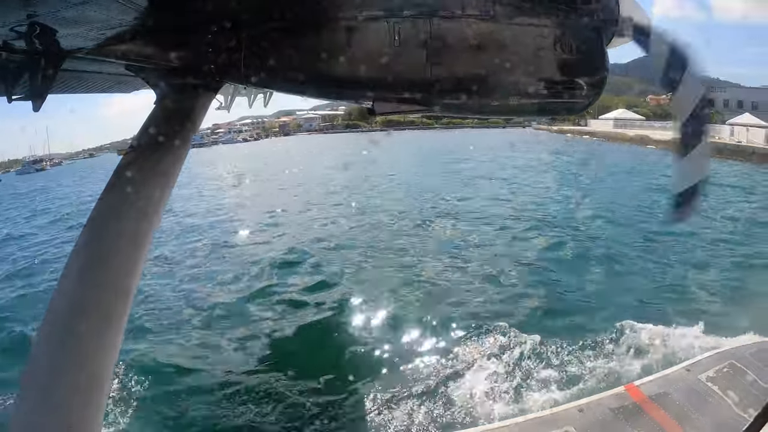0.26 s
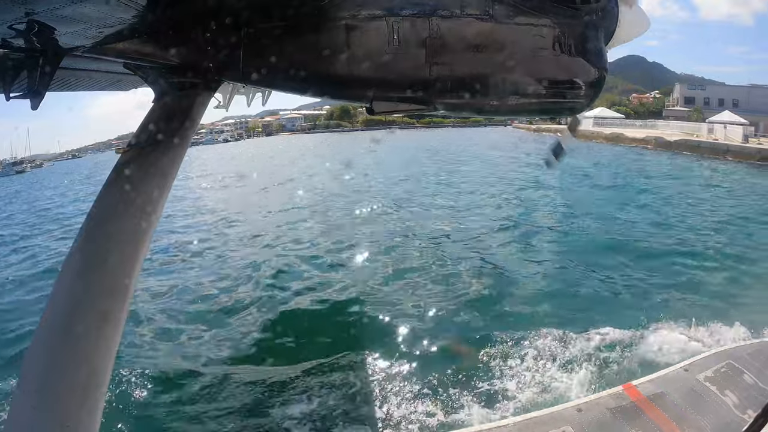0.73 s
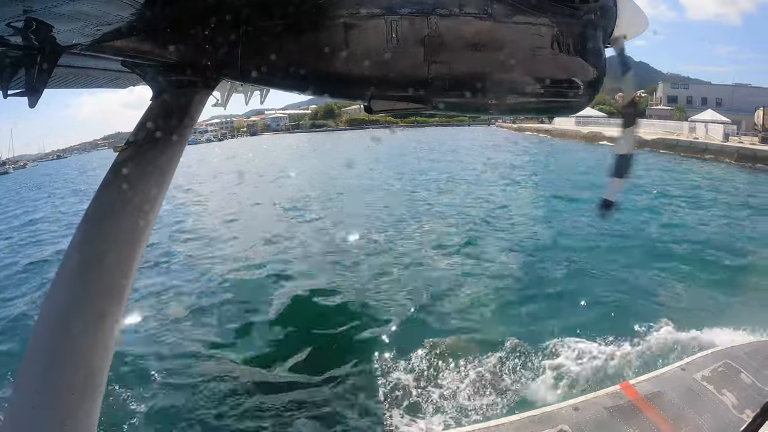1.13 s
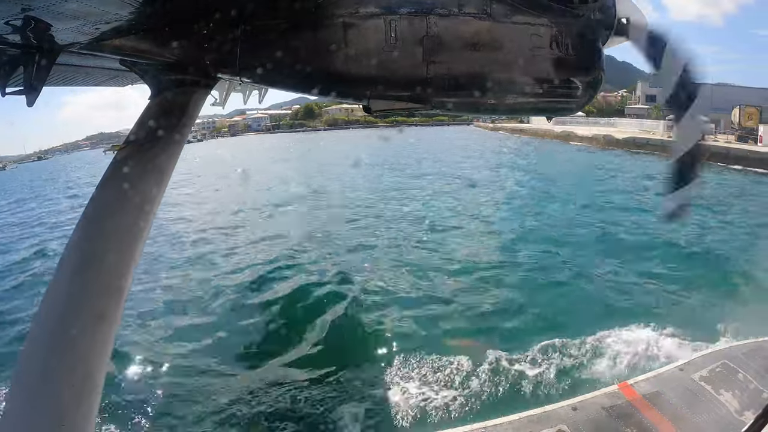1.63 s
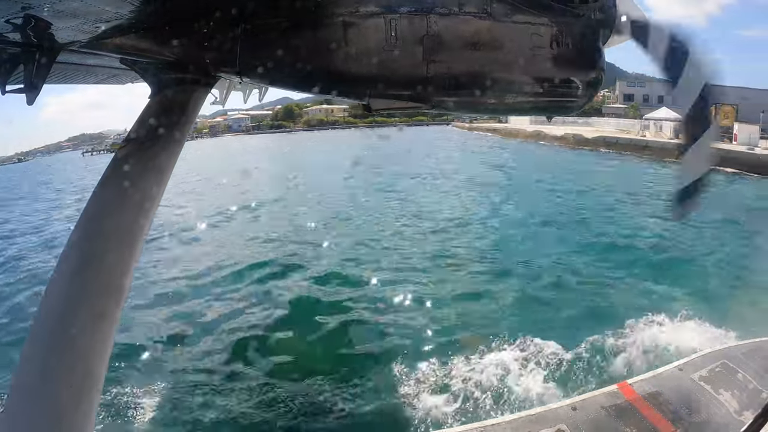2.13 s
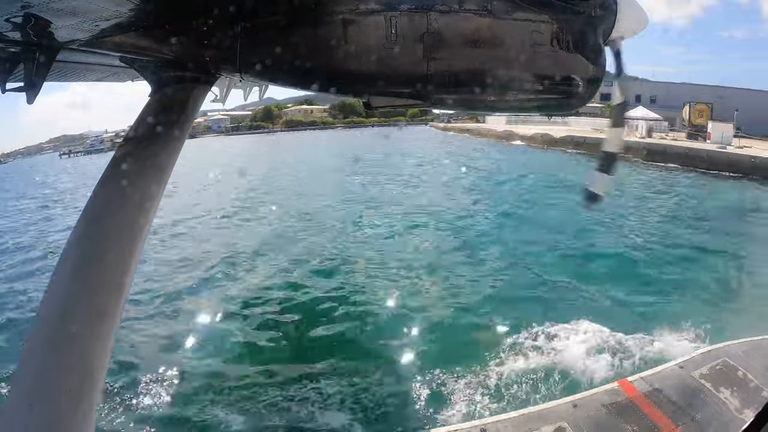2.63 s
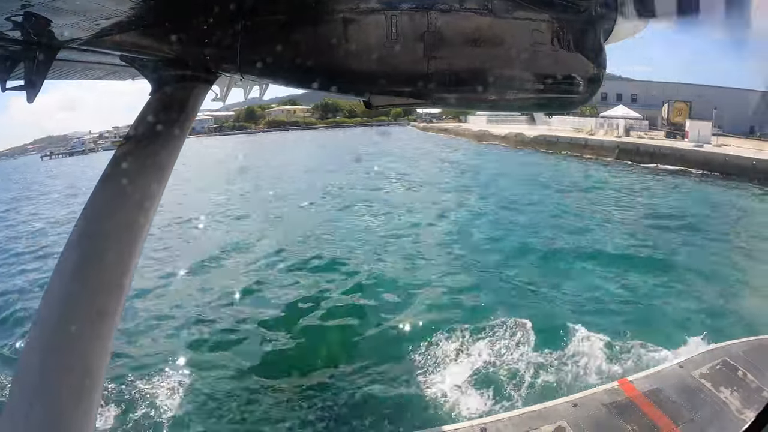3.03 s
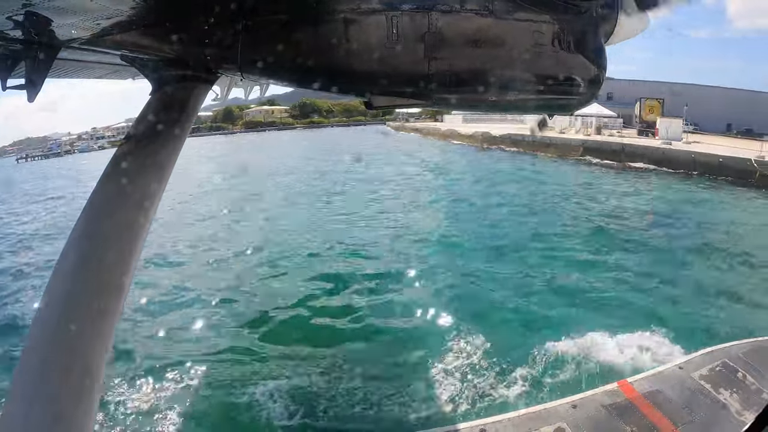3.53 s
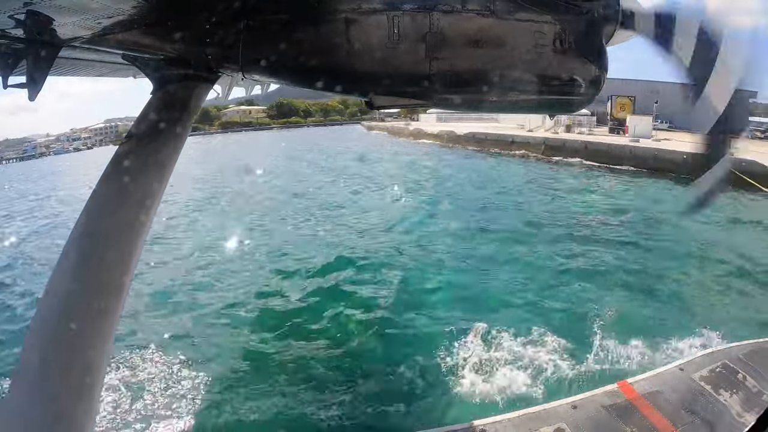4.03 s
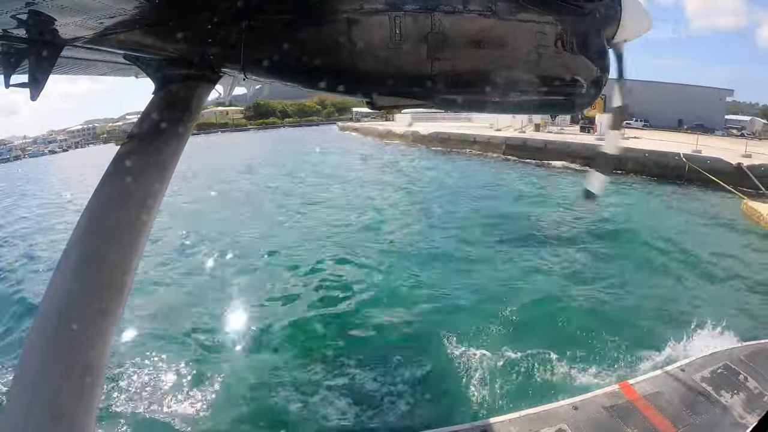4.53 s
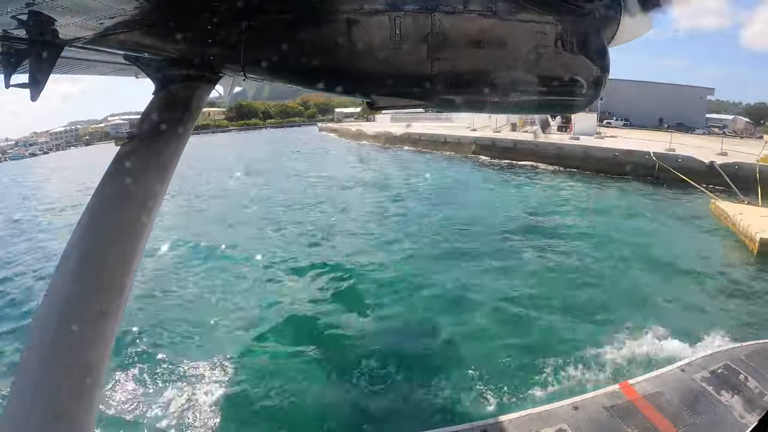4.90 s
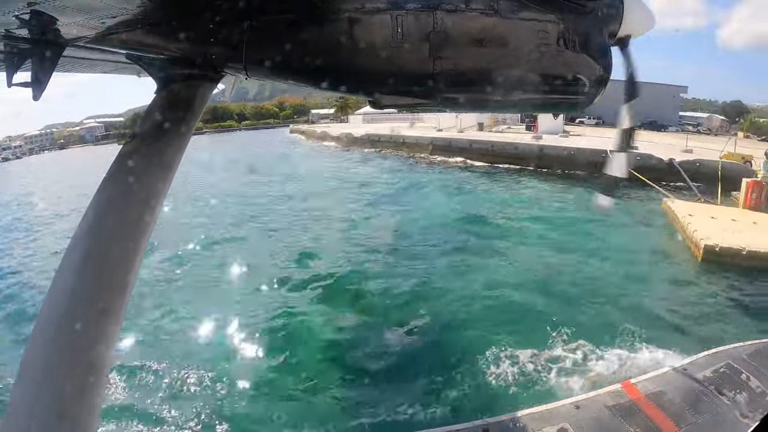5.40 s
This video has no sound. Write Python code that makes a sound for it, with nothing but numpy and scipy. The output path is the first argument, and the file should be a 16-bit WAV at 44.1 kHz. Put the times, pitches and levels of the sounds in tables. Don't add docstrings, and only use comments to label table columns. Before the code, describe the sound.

Two turboprop engines dominate a small cabin on the water: a thick, pulsing hum with lower idling drone and faint thin whistles that fade early. After two seconds the near propeller speeds up and its hum tightens, while the airy whine climbs to a piercing, trembling hiss-like tone. Constant muffled roar and panel buzz surround it, with dull float thumps below. One cabin microphone, near the wall.

```python
import sys
import numpy as np
from scipy import signal
from scipy.fft import rfft, irfft, next_fast_len
from scipy.io import wavfile

SR = 44100
rng = np.random.default_rng(int(sys.argv[2]) if len(sys.argv) > 2 else 0)


def dump(signal):
    limited = np.clip(np.atleast_2d(signal).T, -1, 1)
    pcm = np.round(limited * 32767).astype(np.int16)
    wavfile.write(sys.argv[1], SR, pcm)


def nominal_scale(level):
    x = np.asarray(level, float) / 20
    return 10 ** x


N = 249606

# t/s, f/Hz, level/dB
NEAR_PROPELLER = [(0, 67.3, -10.5), (.4, 67.34, 1.5), (.7, 66.57, -7.5), (1.2, 68.08, -6.5),
                  (1.6, 68.59, 0), (2.0, 68, 4.5), (2.4, 70.9, -2), (2.8, 73.14, 0.5), (3.2, 75.7, 1),
                  (3.6, 79.1, 3.5), (4.0, 83.37, 1), (4.3, 85.87, 0.5), (4.6, 87.46, -1), (4.9, 88.1, 0),
                  (5.2, 88.5, 2), (5.4, 89.77, -4), (5.66, 92.1, -0.5)]


def rms_one(x):
    return x / np.sqrt(np.mean(x ** 2) + 1e-20)


def in_time(rows):
    s, *columns = np.transpose(rows)
    return [np.interp(np.arange(N) / SR, s, c) for c in columns]


def at_hz(points, hz):
    f, db = np.transpose(points)
    return np.interp(np.log(hz), np.log(f), db)


def swells(rows, width_s):
    s = np.arange(N) / SR
    return sum(db * np.exp(-.5 * ((s - centre) / width_s) ** 2) for centre, db in rows)


def drift(rate):
    spacing = 40
    r = np.exp(-80 * np.pi * rate / SR)
    noise = rng.standard_normal(N // spacing + 2002)
    slow = signal.lfilter([1], [1, -2 * r, r * r], noise)[2000:]
    return np.interp(np.arange(N) / spacing, np.arange(len(slow)), rms_one(slow))


def turns(hz):
    return 2 * np.pi * np.cumsum(hz) / SR


def tone(phase, rough, width_hz):
    rough = np.clip(rough, 0, 1)
    phase = phase + .8 * drift(.3)
    ragged = drift(width_hz) * np.cos(phase) + drift(width_hz) * np.sin(phase)
    return np.sqrt(2 - 2 * rough) * np.cos(phase) + np.sqrt(rough) * ragged


def power():
    hz = in_time(NEAR_PROPELLER)[0]
    return (hz - hz.min()) / (hz.max() - hz.min())


def coloured(spectrum):
    # f/Hz, bandwidth/Hz, lift level/dB
    panels = [(350, 36, -3.5), (425, 40, 4), (836, 99, 4), (776, 50, 2), (1350, 33, 3), (1452, 25, 5),
              (1668, 27, 5), (1730, 30, -1.5), (1944, 27, 5), (2104, 97, 3), (2430, 46, 1), (2840, 92, 5.5),
              (3130, 260, 7), (2963, 33, 5), (3336, 45, 6), (3950, 40, 0), (4394, 33, 7), (12700, 830, 5)]
    size = next_fast_len(N)
    hz = np.maximum(np.fft.rfftfreq(size, 1 / SR), 10)
    f, level_db = np.transpose(spectrum)
    db = np.interp(np.log(hz), np.log(f), level_db, left=-80, right=-80)
    db = db + sum(lift / (1 + (2 * (hz - f) / w) ** 2) for f, w, lift in panels)
    white = rfft(rng.standard_normal(size))
    return rms_one(irfft(white * nominal_scale(db), size)[:N])


def roar():
    # t/s, level/dB
    effort = [(0, -1), (.5, -1), (.75, -1.5), (1.3, -0.5), (1.9, 1), (2.15, -1.5), (2.55, -2.5), (2.8, 1),
              (3.25, .5), (3.4, 1), (3.9, 1), (4.35, 0), (4.6, .5), (5.05, 3), (5.25, 3), (5.4, 1),
              (5.66, 2)]
    # f/Hz, level/dB (per Hz)
    rumble_spectrum = [(12, -12), (20, -14), (32, 7), (42, -14), (60, -29)]
    low_spectrum = [(40, -36), (60, 1), (100, -4), (200, 2), (300, -3), (450, -1.5), (600, -6.5),
                    (900, -13), (1050, -23), (1400, -34.5)]
    middle_spectrum = [(560, -15), (950, -5), (1070, -2.5), (1230, 0.5), (1550, -3), (1700, 0.5),
                       (2260, -8.5), (3080, -8), (3670, -11), (5500, -20.5), (7150, -45), (12100, -120)]
    hiss_spectrum = [(2940, -15), (5000, -1), (6500, -4), (7420, -7), (8190, -7.5), (9500, -14),
                     (11400, -20), (12100, -23), (13300, -17.5), (13800, -28), (16500, -22)]
    # t/s, level/dB
    slaps = [
        (.27, 8),
        (.82, 4),
        (.98, 7),
        (1.59, 8),
        (3.25, -1),
        (4.33, 10),
        (4.6, 8),
        (4.98, 8),
        (5.37, 8),
    ]
    # t/s, level/dB
    lulls = [
        (2.25, -1),
        (2.45, 0),
        (3.37, -3),
        (4.8, -1.5),
        (5.54, -4),
    ]
    # t/s, level/dB
    buzzes = [
        (2.8, 8),
        (5.1, 7),
    ]

    effort_db, = in_time(effort)
    chop = 1 + 0.078 * np.cos(turns(in_time(NEAR_PROPELLER)[0]))
    gust_db = (.25 + .7 * power()) * drift(14)
    rumble = nominal_scale(-38.5 + swells(slaps, width_s=0.091)) * coloured(rumble_spectrum)
    low = nominal_scale(-20.5 + 0.19 * effort_db + 0.36 * drift(13)) * coloured(low_spectrum)
    middle = nominal_scale(-32.5 + effort_db + 1.15 * gust_db) * coloured(middle_spectrum)
    hiss_db = -45.5 + 0.86 * effort_db + gust_db + swells(lulls, width_s=.03)
    hiss = nominal_scale(hiss_db) * coloured(hiss_spectrum)
    buzz_hz = np.full(N, 1247)
    buzz = nominal_scale(-46.5 + swells(buzzes, width_s=.15)) * tone(turns(buzz_hz), rough=1.0, width_hz=10)
    return rumble + low + buzz + chop * (middle + hiss)


def idle_engine():
    # t/s, level/dB
    loading = [(0, -1), (1.5, -0.5), (2.1, -7), (3.0, -3), (3.35, -25), (4.2, -13), (4.6, -9), (5.66, -4)]
    # order, level/dB, change of level at full power/dB
    orders = [(1, -23.5, 2), (2, -24, -11), (4, -24.5, -13), (8, -35.5, -1)]
    # t/s, level/dB
    surges = [
        (.3, 5),
        (.62, 12.6),
        (1.1, 9.9),
        (1.2, 11),
        (1.45, 6),
        (2.55, 9.84),
    ]
    whistle_hz = [4958, 5055, 10110, 15170]
    # level/dB, bandwidth/Hz
    whistle_lines = [(-63, 10), (-64, 10), (-79, 12), (-80, 12)]
    fade_s = (.7, 1.7)

    s = np.arange(N) / SR
    phase = turns(48.1 + 1.1 * s)
    loading_db, = in_time(loading)
    levels_db = [db + loading_db + change_db * power() for order, db, change_db in orders]
    first_db, second_db, fourth_db, eighth_db = levels_db
    eighth_db = eighth_db + swells(surges, width_s=.05)
    drone = nominal_scale(first_db) * tone(phase, rough=0.033, width_hz=7.1)
    drone = drone + nominal_scale(second_db) * tone(2 * phase, rough=0.27, width_hz=8.8)
    drone = drone + nominal_scale(fourth_db) * tone(4 * phase, rough=0.3, width_hz=6.0)
    drone = drone + nominal_scale(eighth_db) * tone(8 * phase, rough=0.1, width_hz=6.0)
    whistles = sum(nominal_scale(db) * tone(turns(np.full(N, f)), rough=0.52, width_hz=w)
                   for f, (db, w) in zip(whistle_hz, whistle_lines))
    return drone + nominal_scale(np.interp(s, fade_s, [0, -13])) * whistles


def trailing_propeller():
    # t/s, f/Hz, level/dB, level/dB
    blades = [(0, 63.53, -37, -35.5), (.5, 64.8, -26, -28.5), (1.0, 64.06, -43, -27.5),
              (1.5, 64.69, -35, -27.5), (1.9, 64.97, -32, -41), (2.4, 64.8, -40, -29.5),
              (2.7, 65.67, -27, -26), (3.0, 70.67, -25, -28), (3.3, 73.76, -40, -28),
              (3.7, 76.76, -41, -34.5), (4.2, 80.9, -38, -30), (4.5, 80.45, -18, -33.5),
              (4.85, 81.6, -40, -34), (5.15, 82.6, -54, -33), (5.4, 82.26, -27, -53),
              (5.66, 84.65, -27, -31)]
    upper_orders = [0.5, 2.5, -1, -4.5, 0.5, -5, -6]
    hz, blade_db, upper_db = in_time(blades)
    phase = turns(hz)
    upper = sum(nominal_scale(db) * tone(k * phase, rough=0.74, width_hz=3.48)
                for k, db in enumerate(upper_orders, 2))
    return nominal_scale(blade_db) * tone(phase, rough=.15, width_hz=4.0) + nominal_scale(upper_db) * upper


def compressor():
    # t/s, f/Hz
    whine = [(0, 6265), (.4, 6105), (.75, 5980), (1.1, 5860), (1.4, 5970), (2.05, 6440), (2.5, 6775),
             (2.9, 7060), (3.3, 7510), (3.85, 8130), (4.05, 8260), (4.3, 8130), (4.6, 7900), (4.8, 7910),
             (5.05, 8060), (5.3, 8320), (5.66, 8000)]
    # f/Hz, level/dB
    window = [(5860, -46.5), (6700, -50), (8300, -50), (11700, -69), (12500, -62), (13400, -68),
              (14200, -76), (15200, -73)]
    # t/s, level/dB
    flares = [
        (.33, 8),
        (1.13, 5),
        (1.7, 3.02),
        (2.12, 2.2),
        (2.9, 2),
        (3.28, 7.6),
    ]
    hz, = in_time(whine)
    tremble_hz = 26 + 85 * power() ** 4
    phase = turns(hz + tremble_hz * drift(60))
    first = tone(phase, rough=.7, width_hz=70)
    octave = tone(2 * phase, rough=.55, width_hz=90)
    flicker_db = 1.8 * drift(9)
    first_db = at_hz(window, hz) + swells(flares, width_s=0.049) - 3 + flicker_db
    return nominal_scale(first_db) * first + nominal_scale(at_hz(window, 2 * hz)) * octave


def near_propeller():
    # f/Hz, level/dB
    cabin = [
        [(66, -21), (70, -19), (75, -16.5), (80, -15.5), (90, -13.5)],
        [(132, -18.5), (138, -18.5), (148, -18), (160, -20), (170, -23), (180, -26.5)],
        [(200, -32), (215, -33), (235, -26), (248, -17.5), (258, -24), (268, -19)],
        [(270, -31.5), (330, -41), (345, -24.5), (360, -26.5)],
    ]
    high_orders = [-14, -14, -19.5, -29, -28, -22, -33]
    # t/s, level/dB
    beats = [
        (.14, -10),
        (.66, -10),
        (.86, -4),
        (2.97, -6),
        (4.15, -4),
        (4.44, -10),
        (4.6, -6),
        (4.74, -1),
        (5.38, -11),
    ]
    hz, load_db = in_time(NEAR_PROPELLER)
    phase = turns(hz)
    low_db = [at_hz(path, k * hz) for k, path in enumerate(cabin, 1)]
    low_db[0] = low_db[0] + swells(beats, width_s=0.016)
    low = sum(nominal_scale(db) * tone(k * phase, rough=.015 * k, width_hz=8.1) for k, db in enumerate(low_db, 1))
    high = sum(nominal_scale(db) * tone(k * phase, rough=.55, width_hz=7.0) for k, db in enumerate(high_orders, 5))
    high_db = -22 + 0.27 * (hz - hz.min())
    return nominal_scale(load_db) * (low + nominal_scale(high_db) * high)


def scene():
    background = roar() + idle_engine()
    engines = trailing_propeller() + compressor() + near_propeller()
    return (background + engines)[None]


def top_cut(x):
    return signal.sosfilt(signal.butter(12, 15710, fs=SR, output="sos"), x)


def record(dry):
    mix = 1.043 * np.tanh(dry / 1.14)
    return top_cut(mix)


dry = scene()
out = record(dry)
dump(out)
```